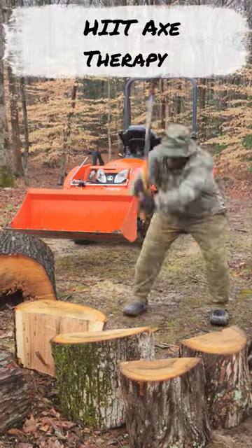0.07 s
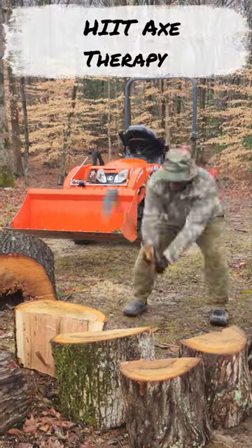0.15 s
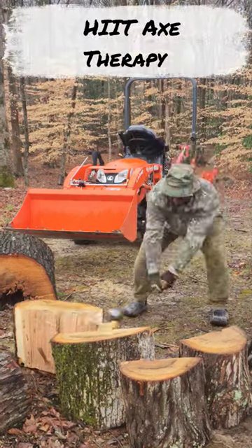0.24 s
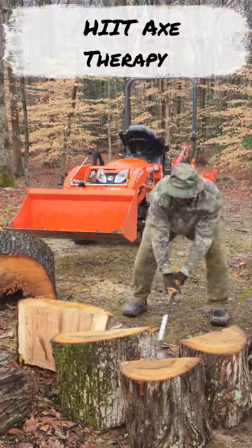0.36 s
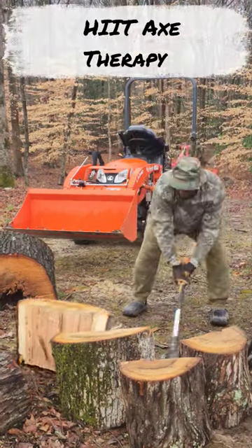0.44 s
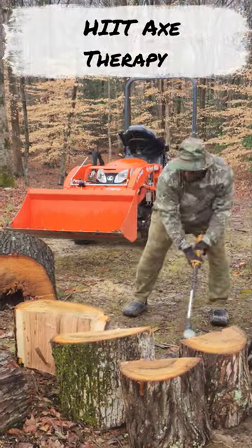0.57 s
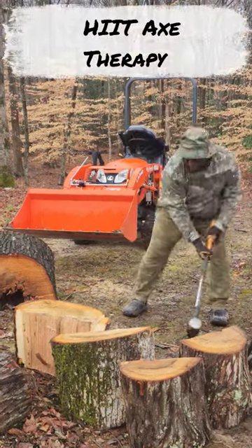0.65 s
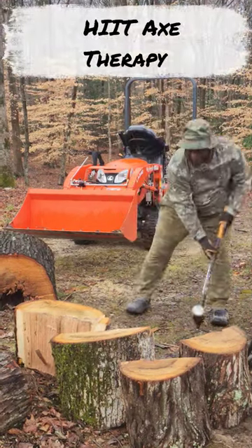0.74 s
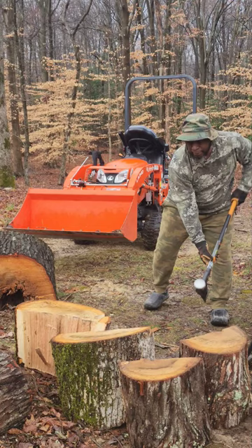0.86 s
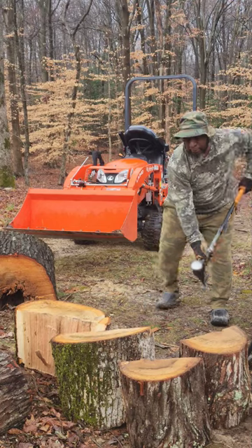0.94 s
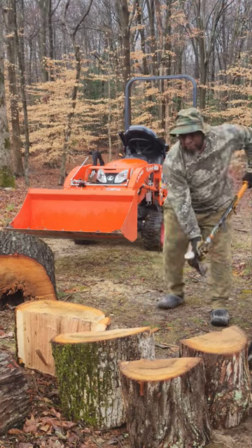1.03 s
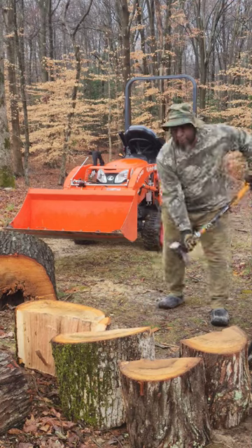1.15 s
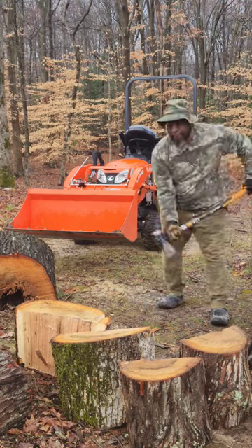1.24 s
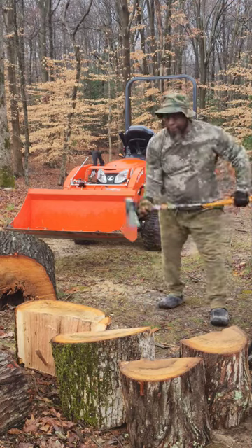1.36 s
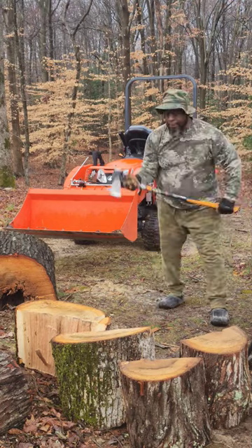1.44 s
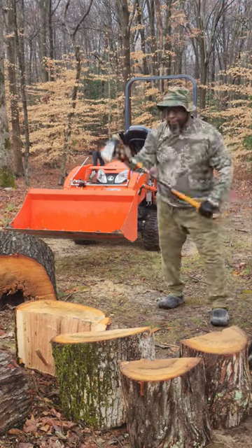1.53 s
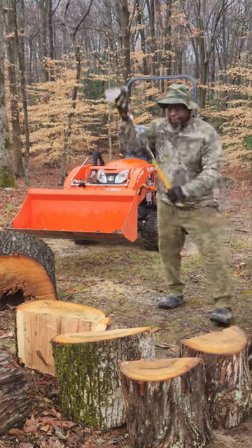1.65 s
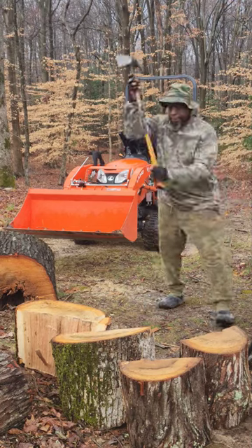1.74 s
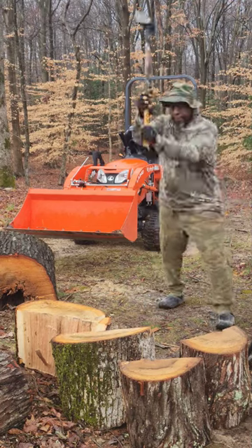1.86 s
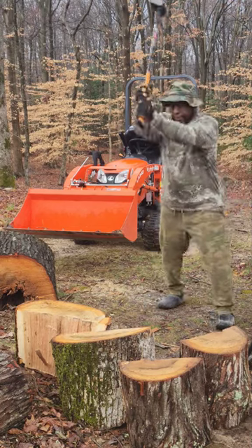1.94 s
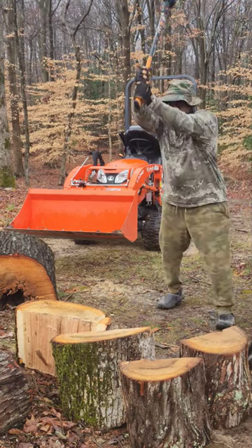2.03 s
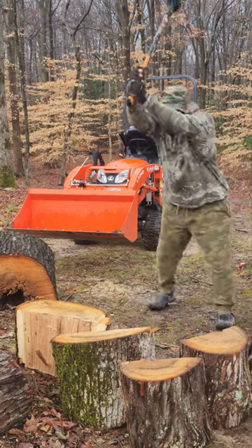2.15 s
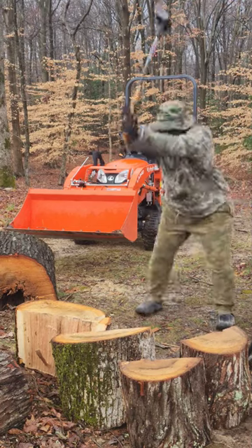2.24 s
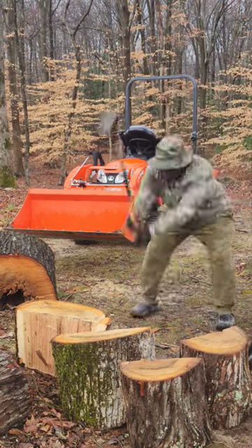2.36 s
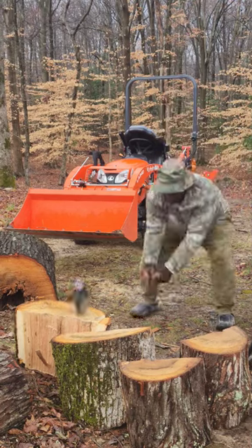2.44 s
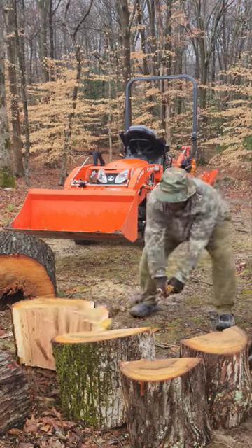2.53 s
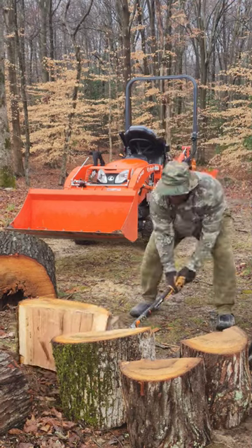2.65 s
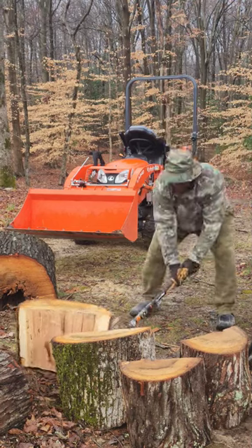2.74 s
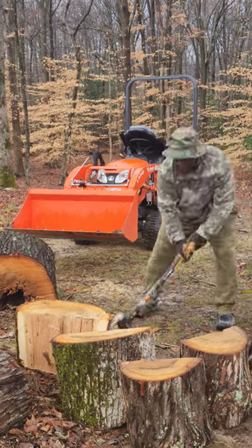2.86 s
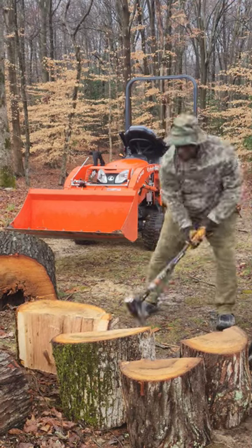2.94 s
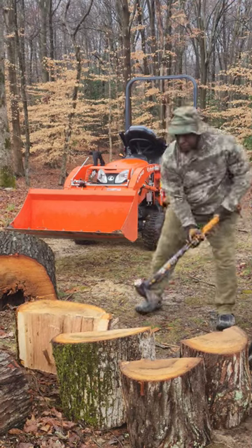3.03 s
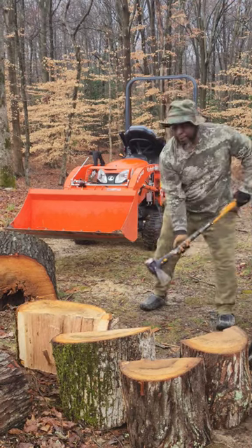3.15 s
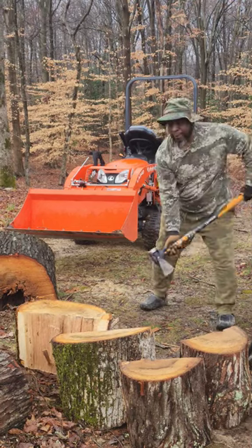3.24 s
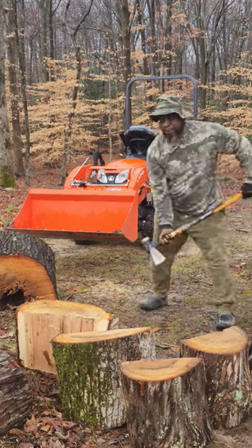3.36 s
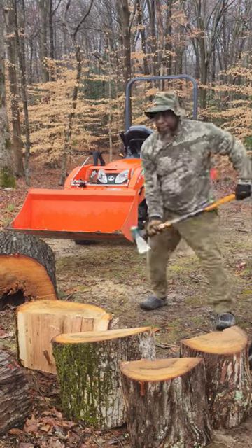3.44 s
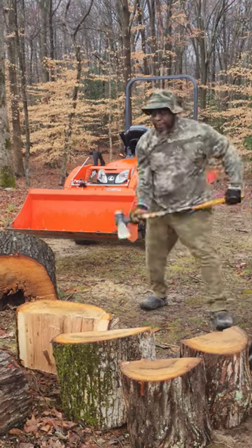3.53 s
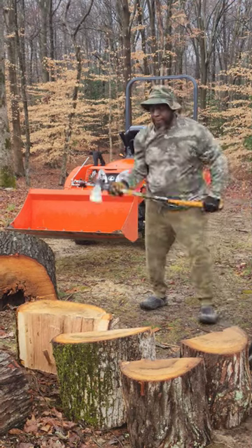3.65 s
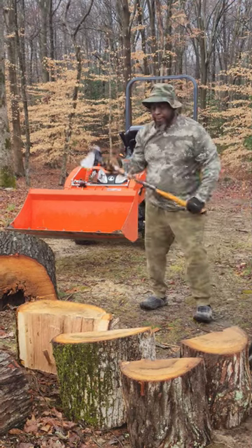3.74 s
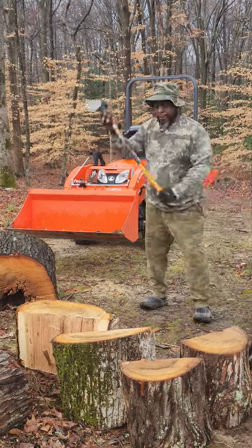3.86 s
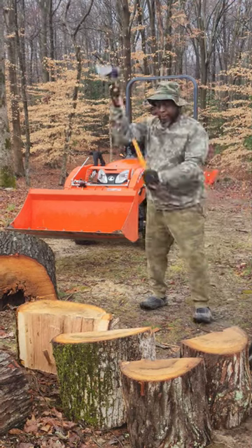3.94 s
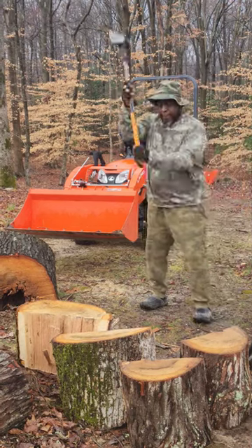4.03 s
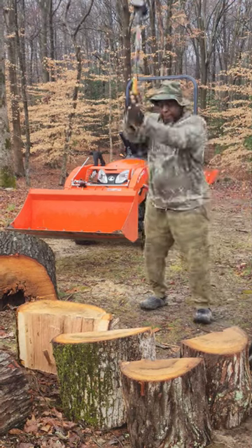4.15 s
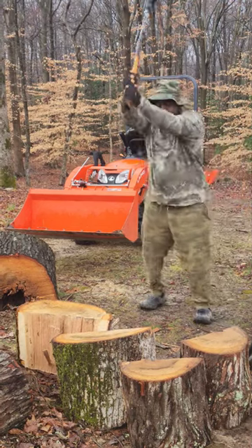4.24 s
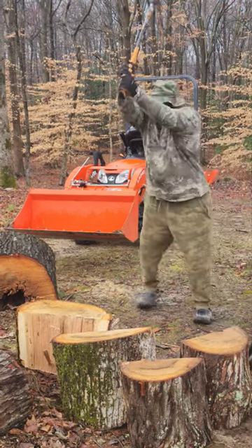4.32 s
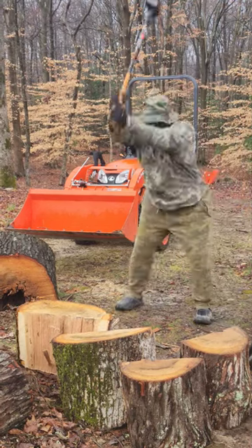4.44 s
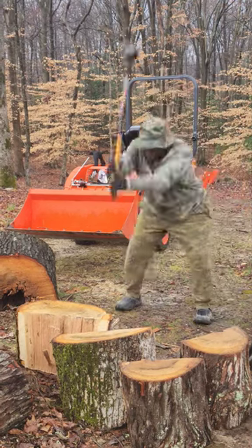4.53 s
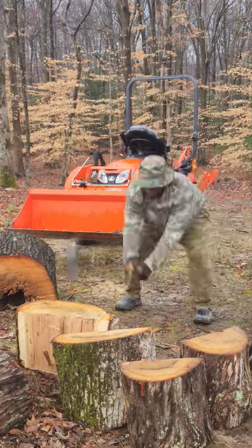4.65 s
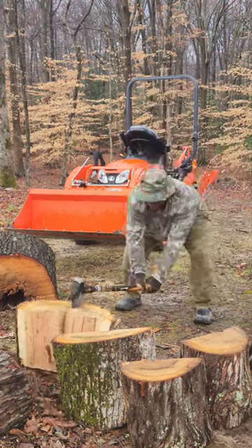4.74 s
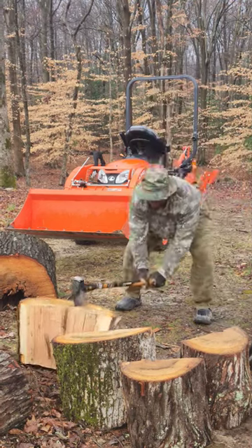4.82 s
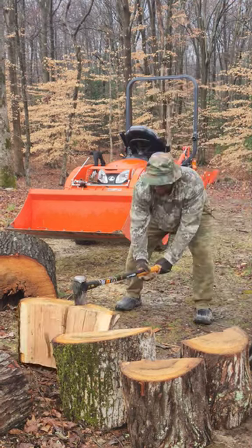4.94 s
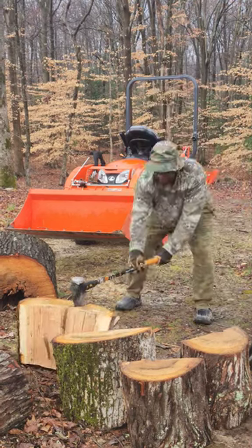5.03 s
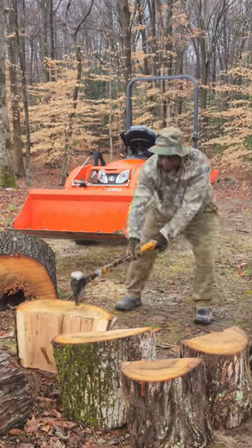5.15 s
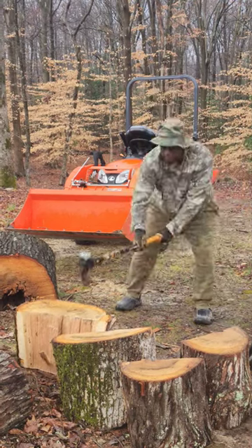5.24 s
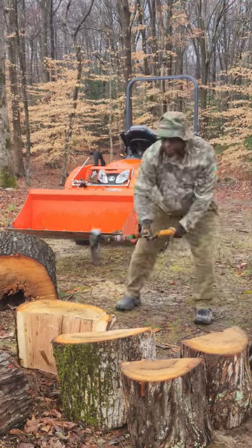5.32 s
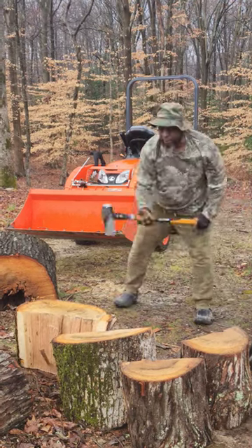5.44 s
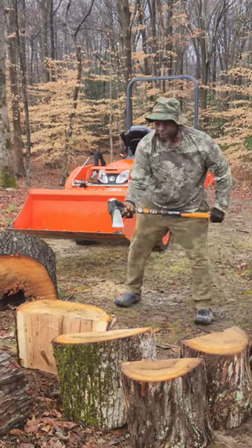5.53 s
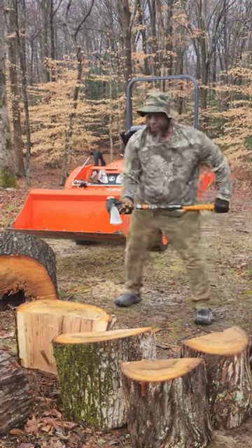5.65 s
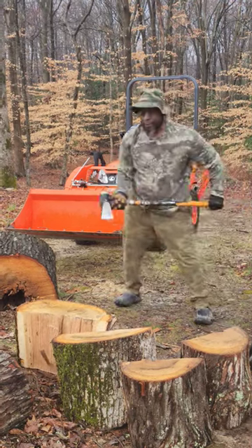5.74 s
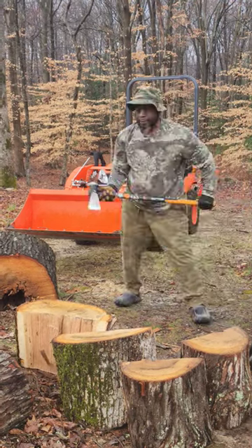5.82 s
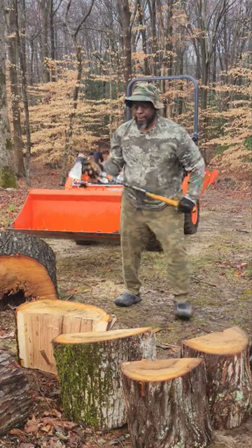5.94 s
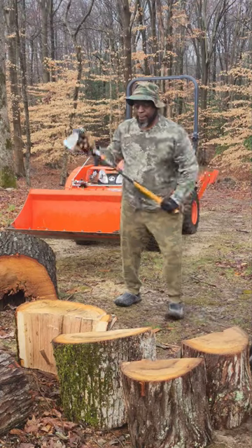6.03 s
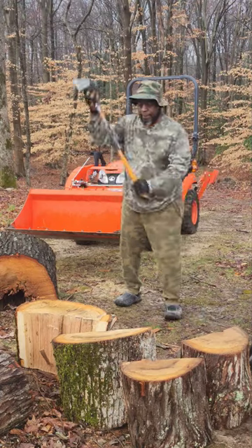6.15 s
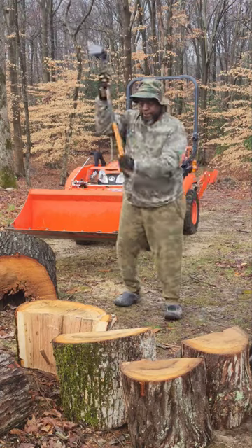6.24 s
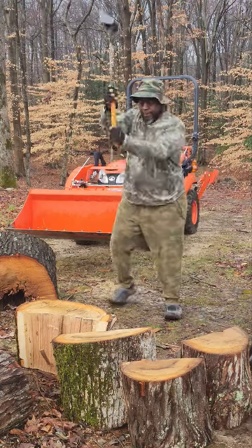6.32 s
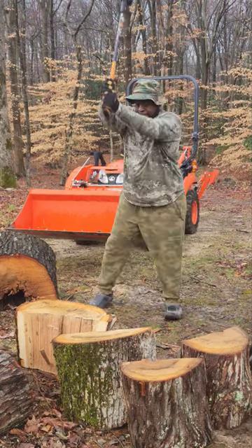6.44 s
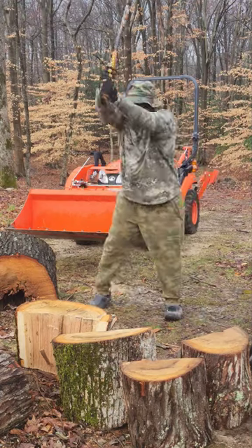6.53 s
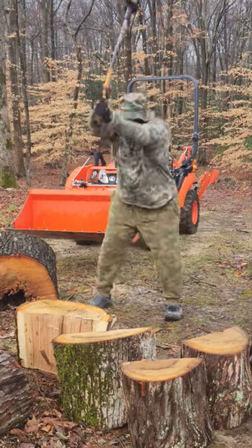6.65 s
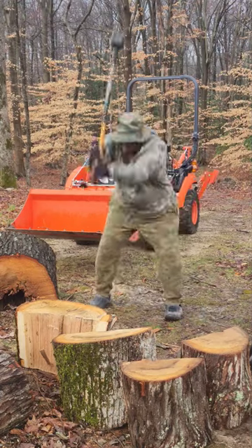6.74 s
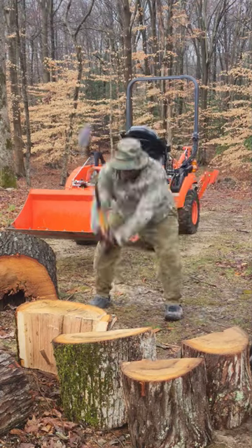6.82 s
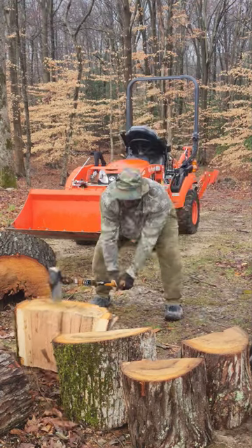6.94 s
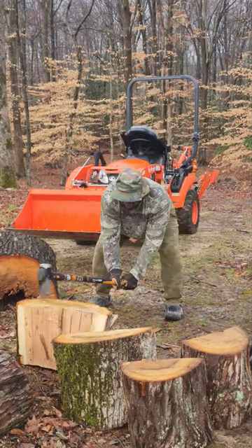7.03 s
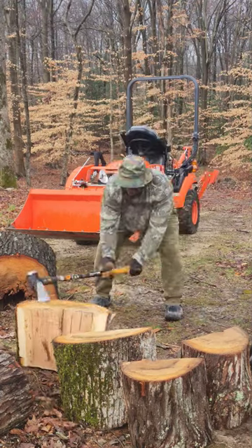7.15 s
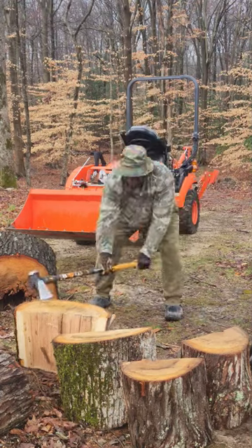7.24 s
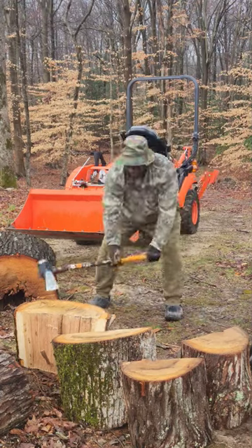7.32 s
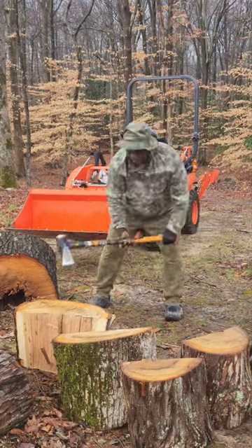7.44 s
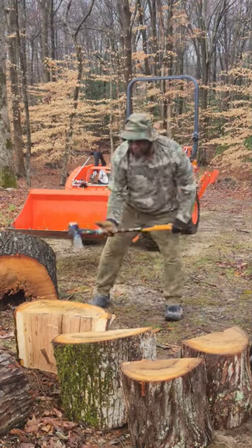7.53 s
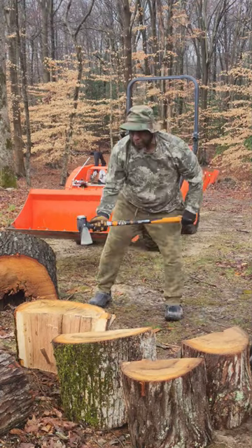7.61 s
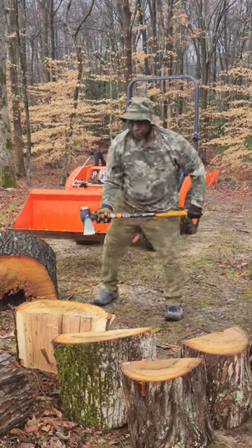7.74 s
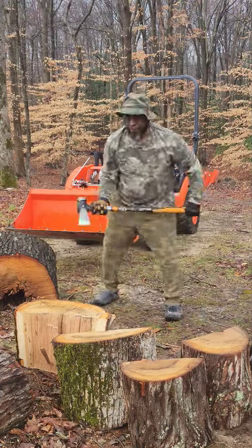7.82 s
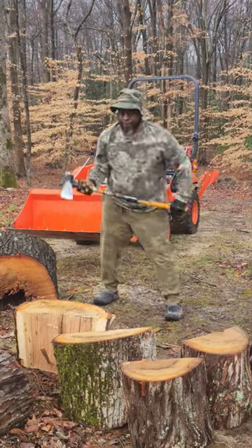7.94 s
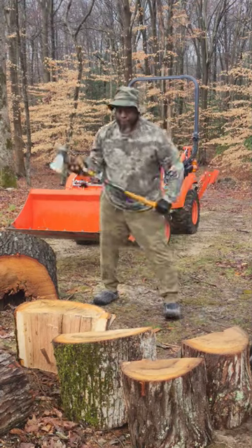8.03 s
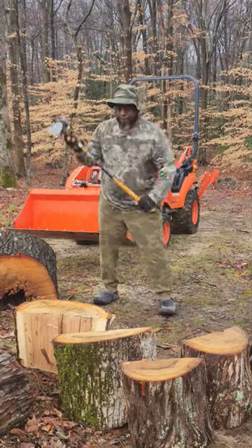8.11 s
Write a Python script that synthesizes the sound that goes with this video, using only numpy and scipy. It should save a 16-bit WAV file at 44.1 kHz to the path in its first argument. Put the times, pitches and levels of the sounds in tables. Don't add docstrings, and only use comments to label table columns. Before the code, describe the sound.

An axe bites hard into log rounds four times at a steady pace in bare woods, with glove rustle and a distant low rumble.

```python
import sys
import numpy as np
from scipy import signal
from scipy.fft import rfft, irfft, next_fast_len
from scipy.io import wavfile
from scipy.ndimage import uniform_filter1d, map_coordinates

SR = 44100
rng = np.random.default_rng(int(sys.argv[2]) if len(sys.argv) > 2 else 0)


def dump_mix(stems):
    frames = np.atleast_2d(stems).T
    limited = np.clip(frames, -1, 1)
    pcm = np.round(limited * 32767).astype(np.int16)
    wavfile.write(sys.argv[1], SR, pcm)


def volts_from_db(level):
    exponent = np.asarray(level, float) / 20
    return 10 ** exponent


N = 360738


def unit(x):
    return x / np.sqrt(np.mean(x ** 2) + 1e-20)


def along(points, hz, axis=1):
    rows = np.transpose(points)
    return np.interp(np.log(hz + 1), np.log(rows[0] + 1), rows[axis])


def wobble(rate):
    knots = rng.standard_normal(int(N * rate / SR) + 4)
    return map_coordinates(knots, [np.arange(N) * rate / SR])


def smooth_noise(shape, *sizes):
    field = rng.standard_normal(shape)
    for axis, size in enumerate(sizes):
        field = uniform_filter1d(field, size=size, axis=axis)
    return field


def filtered(x, response):
    n = np.shape(x)[-1]
    m = next_fast_len(n + 8192)
    return irfft(rfft(x, m) * response(np.fft.rfftfreq(m, 1 / SR)), m)[..., :n]


def resonant(x, modes):
    def response(f):
        total = 0
        for k, (centre, width, db) in enumerate(modes):
            total = total + (-1) ** k * volts_from_db(db) * 1j * f * width / (centre * centre - f * f + 1j * f * width)
        return total
    return filtered(x, response)


def tinted(x, noise):
    grid = np.geomspace(20, SR / 2, 1000)
    total = np.cumsum(np.abs(rfft(x, SR)) ** 2)
    upto = lambda hz: np.interp(hz, np.arange(len(total)), total)
    power = (upto(1.2 * grid + 50) - upto(.83 * grid - 50)) / (.37 * grid + 100)
    power = uniform_filter1d(power, size=40)
    return filtered(noise, lambda hz: np.sqrt(np.interp(hz, grid, power)))


def rush(spectrum, patchy_db, channels=2):
    z = signal.stft(rng.standard_normal((channels, N)), nperseg=512)[2]
    patches = volts_from_db(patchy_db * unit(smooth_noise(z.shape[1:], 6, 8)))
    noise = signal.istft(z * patches, nperseg=512)[1][:, :N]
    return unit(filtered(noise, lambda hz: volts_from_db(along(spectrum, hz))))


def add(track, s, x):
    part = track[..., round(s * SR):][..., :x.shape[-1]]
    part += x[..., :part.shape[-1]]


# (f/Hz, likeness 0 to 1)
ALIKE = [(60, .988), (180, 0.98), (550, 0.59), (1650, 0.29), (4970, 0.22), (15000, 0.4)]


def diffuse(pair):
    turn = lambda hz: np.arccos(np.clip(along(ALIKE, hz), -1, 1)) / 2
    mid, side = filtered(pair, lambda hz: np.array([np.cos(turn(hz)), np.sin(turn(hz))]))
    return np.array([mid + side, mid - side])


def ports(x, lag_us, pan_db, knee_hz=90000):
    half = np.array([[1], [-1]]) / 2

    def response(hz):
        lag_s = lag_us * 1e-6 * half / np.hypot(1, hz / knee_hz)
        return volts_from_db(pan_db * half) * np.exp(-2j * np.pi * hz * lag_s)
    return filtered(x, response)


# (f/Hz, near trunks' 60 dB fade t/s, near level/dB, far trees' fade t/s, far level/dB)
TREES = [(115, .25, -12.5, 2, -18), (290, 0.63, -6.5, 1, -20), (700, 0.25, -9, 1.894, -25),
         (1460, 0.4, -9.5, 0.97, -20.5), (3545, 0.55, -15, .9, -17.5), (8600, .35, -4, .7, -15.5),
         (11000, 0.14, -1.5, .6, -26), (15000, 0.3, -4.5, .6, -23.5)]


def trees(x, far_db):
    hz, t, z = signal.stft(rng.standard_normal((2, 2 * SR)), SR, nperseg=256)
    decay = lambda k: volts_from_db(along(TREES, hz, k + 1)[:, None] - 60 * t / along(TREES, hz, k)[:, None])
    near, far = decay(1), volts_from_db(far_db) * decay(3)
    patches = volts_from_db(1.2 * unit(smooth_noise(z.shape[1:], 30, 6)))
    tail = signal.istft(z * np.hypot(near, far) * patches, SR, nperseg=256)[1]
    rise = 1 - np.exp(-(np.arange(tail.shape[1]) / SR / 0.004) ** 2)
    return diffuse(tinted(x, tail / 45) * rise)


# (t/s, level/dB)
RUMBLE = [(0.0, -45), (0.16, -43.5), (0.63, -48), (2.64, -47), (2.89, -48.5), (7.31, -48), (8.18, -50.5)]
# (f/Hz, level/dB per Hz)
DRONE = [(12, -48), (20, -13.5), (48, -2), (70, 0), (113, -5.5), (179, -19), (268, -29), (331, -28),
         (400, -35), (520, -57.5), (880, -120)]
AIR = [(120, -26), (200, -5.5), (273, -10), (334, -9.5), (500, -13.5), (579, -13), (1680, -33), (3130, -31),
       (4270, -46.5), (7410, -40.5), (9060, -48.5), (16000, -54.5)]


def background():
    s, db = np.transpose(RUMBLE)
    rumble_db = np.interp(np.arange(N) / SR, s, db) + 1.5 * wobble(5)
    rumble = volts_from_db(rumble_db) * diffuse(rush(DRONE, patchy_db=1.5))
    return rumble + volts_from_db(-69.5) * diffuse(rush(AIR, patchy_db=.9))


# (t/s, length t/s, first f/Hz, last f/Hz, level/dB)
WHISTLES = [(0, 0.17, 2630, 2700, -67), (.1, 0.19, 2640, 2620, -74), (.1, 0.19, 2850, 2680, -77),
            (1.975, .24, 2620, 2610, -73), (2.2, 0.36, 2580, 2660, -73), (2.08, 0.45, 2400, 2340, -78),
            (5.077, .16, 2520, 2680, -75), (5.26, 0.21, 2600, 2820, -72), (7.33, 0.21, 2590, 2640, -75),
            (7.57, 0.12, 2580, 2720, -74), (7.82, .12, 2620, 2710, -71), (7.9, 0.28, 2620, 2670, -75),
            (7.7, 0.14, 2800, 2818, -79), (7.94, 0.16, 2780, 2840, -79), (7.75, .35, 2400, 2410, -80)]
# (t/s,
# length t/s, first f/Hz, last f/Hz, level/dB)
CAWS = [
    (1.478, 0.07, 1330, 1570, -69),
    (1.53, 0.14, 1520, 1330, -68.5),
    (1.915, 0.05, 1310, 1500, -70.5),
    (1.95, .09, 1530, 1560, -72),
    (2.039, 0.1, 1390, 1330, -74),
    (2.38, .3, 1560, 1534, -72.5),
    (3.003, 0.82, 1300, 1295, -75),
    (5.924, 0.07, 3040, 2980, -78),
    (6.2, 0.14, 2260, 2190, -78),
]


def birds():
    out = np.zeros((2, N))
    calls = [(*row, 30) for row in WHISTLES]
    calls += [(*row, 60 + 160 * row[1] ** 2) for row in CAWS]
    for s, length, first_hz, last_hz, db, blur_hz in calls:
        n = round(length * SR)
        phase = 2 * np.pi * np.cumsum(np.linspace(first_hz, last_hz, n)) / SR
        flutter = filtered(rng.standard_normal((2, 2, n)), lambda hz: 1 / (1 + (hz / blur_hz) ** 2))
        smeared = unit(flutter[0] * np.sin(phase) + flutter[1] * np.cos(phase))
        direct = .6 * min(1, .2 / length) * np.sin(phase)
        add(out, s, volts_from_db(db) * unit(smeared + direct) * signal.windows.tukey(n, .3))
    return out


def moves(rows):
    t = np.arange(N) / SR
    gain = 0
    for s, rise, fall, db in rows:
        away = (t - s) / np.where(t < s, rise, fall)
        gain = gain + volts_from_db(db - 18.5 * away ** 2)
    return gain


# (loudest t/s, rise t/s, fall t/s, hiss level/dB)
SLIDES = [
    (.75, 0.099, .05, -68.5),
    (.835, 0.068, 0.11, -58.5),
    (1.03, 0.068, 0.045, -60),
    (3.135, 0.11, 0.095, -59),
    (3.28, 0.11, 0.064, -66.5),
    (5.465, 0.043, 0.11, -63.5),
    (5.59, 0.047, 0.044, -62),
    (7.25, 0.073, 0.047, -67),
    (7.55, 0.03, .07, -62),
    (7.64, 0.045, 0.059, -62),
]
# (loudest t/s, rise t/s, fall t/s, hiss level/dB)
LIFTS = [
    (1.8, 0.047, .08, -68.5),
    (1.93, 0.12, .1, -58.5),
    (3.82, 0.045, .05, -80.5),
    (4.07, 0.053, .08, -64),
    (4.17, 0.086, 0.083, -61.5),
    (6.3, 0.049, 0.081, -66),
    (6.41, 0.12, 0.1, -61.5),
]
# (loudest t/s, rise t/s, fall t/s, scuff level/dB)
SCUFFS = [(.054, 0.014, .05, -43.5), (1.79, 0.03, 0.055, -67.5), (2.17, 0.036, 0.034, -77.5),
          (2.312, 0.032, 0.088, -47), (3.6, 0.06, .1, -68.5), (4.528, 0.022, .03, -53.5),
          (5.196, .02, 0.021, -58), (5.59, .04, 0.033, -71.5), (6.16, .03, .03, -79),
          (6.555, .03, .03, -66), (7.26, .06, 0.056, -62), (7.638, .04, 0.044, -70.5),
          (7.824, 0.03, 0.022, -73)]
# (f/Hz, level/dB per Hz)
GLOVE = [(2650, -35), (4500, -10.5), (6770, -3), (9510, -8), (11000, -19.5), (14800, -17), (15700, -9),
         (16000, -22)]
CLOTH = [(1800, -29), (2600, -4), (3600, 0), (4800, -4.5), (6500, -27.5)]
SLEEVE = [(180, -38.5), (300, -6.5), (507, -12), (754, -6.5), (937, -14), (1460, -3.5), (1730, -10.5),
          (2600, -13.5), (3600, -31.5), (5720, -120)]


def clothes():
    slide, lift, turn, t = moves(SLIDES), moves(LIFTS), moves(SCUFFS), np.arange(N) / SR
    stir = volts_from_db(-83 + 4 * wobble(8))
    for s, *_ in BLOWS:
        stir = stir + (t > s) * volts_from_db(-60 - 60 * np.abs(t - s) / 2.2)
    hiss = slide + lift + volts_from_db(-12) * turn + volts_from_db(-95 + 5 * wobble(8.1))
    rasp = volts_from_db(-7.5) * slide + volts_from_db(-16) * lift + volts_from_db(-10.5) * turn + volts_from_db(-12) * stir
    scuff = turn + volts_from_db(-12) * slide + volts_from_db(-16.5) * lift + stir
    grain = wobble(70)
    glove = rush(GLOVE, patchy_db=2.0, channels=3) * volts_from_db(1.46 * grain) * hiss
    cloth = rush(CLOTH, patchy_db=2.2, channels=3) * volts_from_db(2.5 * grain) * rasp
    sleeve = rush(SLEEVE, patchy_db=2.5, channels=3) * volts_from_db(2.2 * wobble(160) - .8) * scuff
    rustle = glove + cloth + sleeve
    return .7 * ports(rustle[0], lag_us=-150, pan_db=1.5) + .75 * diffuse(rustle[1:])


# (t/s, peak level/dB, centre f/Hz, 60 dB
# fade t/s, rise t/ms)
TICKS = [
    (1.7883, -48.5, 2030, 0.063, 2),
    (2.276, -45, 1320, 0.042, 11),
    (2.6223, -26.5, 1611, 0.043, 1.1),
    (3.6381, -65, 1460, 0.046, 4.2),
    (5.1913, -44, 1330, 0.06, 1.7),
         (1.4586, -68, 7280, 0.032, 0.8),
    (2.3849, -44.5, 8970, 0.021, 0.67),
    (2.69, -37, 4140, 0.052, 0.71),
    (2.7033, -34.5, 4340, 0.026, 0.76),
    (4.2802, -63, 4450, 0.035, 0.82),
    (5.1741, -55, 7830, 0.035, 0.94),
    (5.1885, -49.5, 7900, 0.03, 0.8),
    (7.0932, -29, 4206, 0.016, 1),
    (7.417, -68, 7350, 0.035, 0.81),
]


def ticks():
    out, t = np.zeros((3, N)), np.arange(SR // 10) / SR
    for s, db, hz, t60, rise_ms in TICKS:
        modes = [(hz, 0.63 * hz, 0), (13000, 6000, -12)]
        puff = unit(resonant(rng.standard_normal((3, len(t))), modes))
        rise = 1 - np.exp(-(1000 * t / rise_ms) ** 2)
        add(out, s, volts_from_db(db - 5.5 - 60 * t / t60) * puff * rise)
    return 0.64 * ports(out[0], lag_us=-48.0, pan_db=5.0) + 0.9 * diffuse(out[1:])


# (t/s, peak level/dB, pitch f/Hz, 60 dB fade t/s, higher modes level/dB)
KNOCKS = [
    (0.321, -16, 798, 0.036, -19),
    (2.731, -24.5, 217, 0.034, -9.5),
    (7.154, -21, 279, 0.023, 2.5),
]


def knocks():
    out, t = np.zeros((2, N)), np.arange(SR // 6) / SR
    for s, db, hz, t60, upper_db in KNOCKS:
        mode = lambda k: np.sin(2 * np.pi * hz * k * t)
        modes = mode(0.92) + volts_from_db(upper_db) * (.5 * mode(1.0) + mode(2.6))
        knock = volts_from_db(db - 60 * t / t60) * modes * (1 - np.exp(-(t / 0.0011) ** 2))
        add(out, s + .0015, ports(knock, lag_us=65, pan_db=.3))
        add(out, s, volts_from_db(-1.5) * trees(knock, far_db=-1.0))
    return out


def chips(count):
    when, size, place = rng.random((3, count))
    hits = np.zeros((2, SR // 2))
    at = (SR * (.015 + .45 * when)).astype(int)
    hits[:, at] = (2 * size - 1) * [place, 1 - place]
    spray = unit(resonant(hits, [(7500, 5000, -3.5), (13500, 4000, -1.0)]))
    return spray * volts_from_db(-60 * np.arange(SR // 2) / SR / .6)


# (t/s, push level/dB, ring level/dB, crack level/dB, push t/ms)
BLOWS = [
    (0.2921, -2, -15.5, -19, 2.3),
    (2.5408, -0.5, -17.5, -17.5, 2.4),
    (4.7643, -5, -14.5, -16.5, 2.5),
    (6.9902, -7, -14.5, -16.5, 4.8),
]
# (f/Hz, width f/Hz, level/dB)
ROUNDS = [
    [(550, 35, -5.5), (720, 180, 7), (1540, 33, -16.5), (2020, 110, -15.5), (2460, 29, -17.5),
     (2855, 37, -15.5), (3490, 77, -13.5)],
    [(449.7, 19, 0), (695, 41, -1.5), (1204, 29, -21), (1565, 54, -14), (2390, 26, -17.5),
     (2970, 47, -31.5), (3870, 46, -28)],
    [(216.2, 72, -0.5), (436, 32, 1.5), (819.6, 41, -8), (1520, 50, -7), (2374, 110, -9.5), (2969, 26, -22),
     (3717, 220, -22.5)],
    [(223.1, 46, 6), (519, 99, -4), (699, 110, -1.5), (1312, 79, -8.5), (1457, 20, -7), (1850, 58, -26.5),
     (2600, 25, -24.5), (3547, 77, -27)],
]
# (round's 60 dB fade t/s, ground thud level/dB, thud f/Hz, steel ring level/dB, echo level/dB)
SHAKE = [
    (0.18, -27.5, 75, -42.5, 0),
    (0.19, -29.5, 48, -41, 2),
    (.13, -21.5, 64, -37, 1),
    (0.16, -14.5, 57.4, -35.5, -1.5),
]
# (tearing t/ms, treble above 10 kHz level/dB, flying chips level/dB, swish level/dB)
COLOUR = [
    (17, 4, -51, -39.5),
    (12, -4, -51.5, -33.5),
    (8.9, -2, -52.5, -41),
    (11, -3, -53.5, -47),
]
# (f/Hz, level/dB per Hz)
FIBRES = [(400, -32.5), (800, 5.5), (2000, -1.5), (3400, -4), (5500, -9), (8500, -6), (10700, -16.5),
          (12500, -12.5), (15000, -15), (16500, -21)]
# (f/Hz, width f/Hz, level/dB)
STEEL = [(1510, 220, -.5), (2500, 280, -4)]


def axe():
    out, t = np.zeros((2, N)), np.arange(SR // 3) / SR
    noise = lambda: rng.standard_normal(len(t))
    lead = .0033
    for blow_row, modes, after, colour in zip(BLOWS, ROUNDS, SHAKE, COLOUR):
        s, push_db, ring_db, crack_db, push_ms = blow_row
        t60, thud_db, thud_hz, steel_db, echo_db = after
        tear_ms, treble_db, chips_db, swish_db = colour

        u = (t - lead) / (push_ms / 1000)
        push = -np.sin(2 * np.pi * u) * np.exp(-((u - .45) / 0.46) ** 2)
        push = volts_from_db(push_db) * push

        entry = np.clip(t / lead, 0, 1)
        cutting = entry / (1 + (t / (tear_ms / 1000)) ** 7)
        snaps = rng.standard_normal((3, len(t))) * volts_from_db(3.5 * unit(smooth_noise(len(t), 40)))
        treble = [(7000, 0.0051), (12000, treble_db)]
        tearing = unit(filtered(snaps, lambda hz: volts_from_db(along(FIBRES, hz) + along(treble, hz))))
        crack = tearing * (cutting + 0.13 * entry * volts_from_db(-60 * t / 0.15))

        shaking = unit(resonant(noise(), modes)) * entry * volts_from_db(-60 * t / t60)
        struck = resonant(snaps[0] * cutting * volts_from_db(-60 * t / .05), modes)
        ring = .7 * shaking + 2.9 * struck / np.abs(struck).max()

        steel = unit(resonant(resonant(noise(), STEEL), STEEL))
        steel = (1 - np.exp(-t / 0.027)) * volts_from_db(-60 * (t / 0.42) ** 1.3) * steel
        thud = -np.sin(2 * np.pi * thud_hz * (t - .01)) * volts_from_db(-60 * t / .2) * (np.exp(-(t / .015) ** 2) - 1)

        blow = push + volts_from_db(ring_db) * ring + volts_from_db(crack_db) * crack[0]
        near = blow + volts_from_db(steel_db) * steel + volts_from_db(thud_db) * thud
        add(out, s - lead, ports(near, lag_us=80, pan_db=.4, knee_hz=10000))
        add(out, s - lead, volts_from_db(crack_db - 4) * diffuse(crack[1:]))
        carried = blow - 0.24 * push
        add(out, s - lead, volts_from_db(echo_db) * trees(carried, far_db=0.5))
        add(out, s, volts_from_db(chips_db) * chips(count=5000))

        swish = unit(tinted(blow, rng.standard_normal((2, 1000)))) * np.linspace(.35, 1., 1000) ** 2.0
        add(out, s - lead - 1000 / SR, volts_from_db(swish_db) * diffuse(swish))
    return out


def scene():
    return axe() + knocks() + ticks() + clothes() + birds() + background()


def band_limit(x):
    return signal.sosfilt(signal.butter(12, 16640, fs=SR, output="sos"), x)


def record(dry):
    dry = filtered(dry, lambda hz: 1 / (1 + np.exp(np.clip((hz - 15650) / 70, -50, 50))))
    held = dry / (1 + np.abs(dry / .98) ** 6) ** (1 / 6)
    return band_limit(held)


dry = scene()
out = record(dry)
dump_mix(out)
```